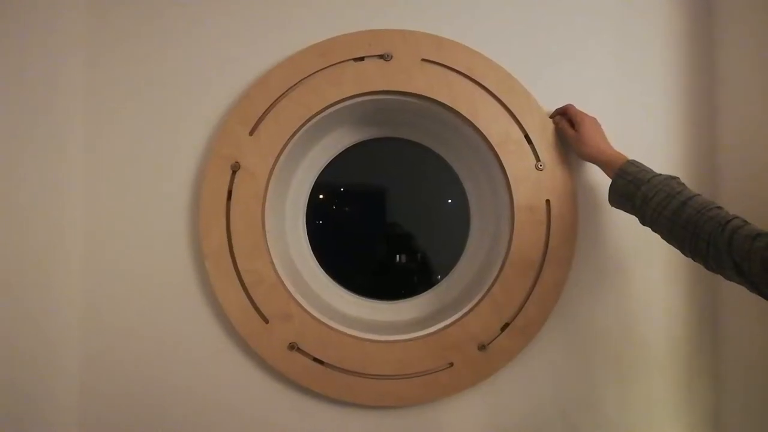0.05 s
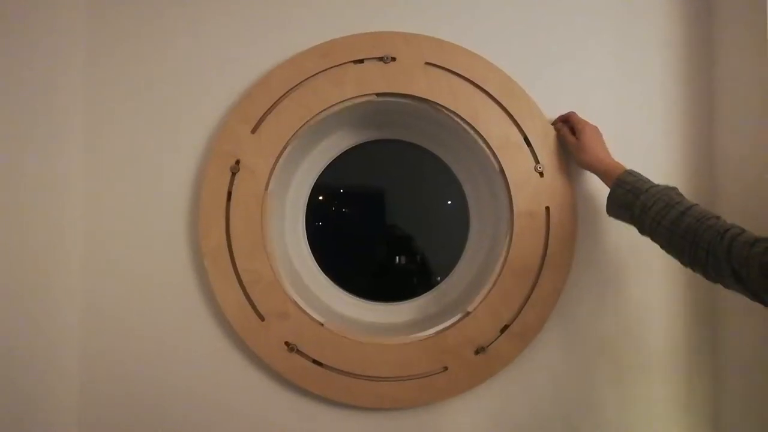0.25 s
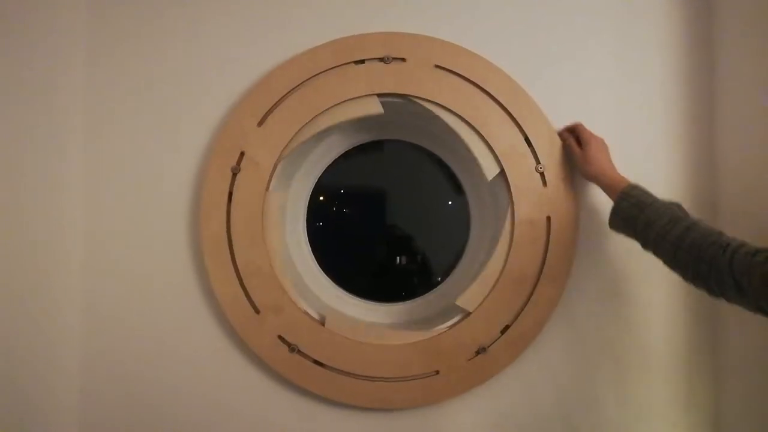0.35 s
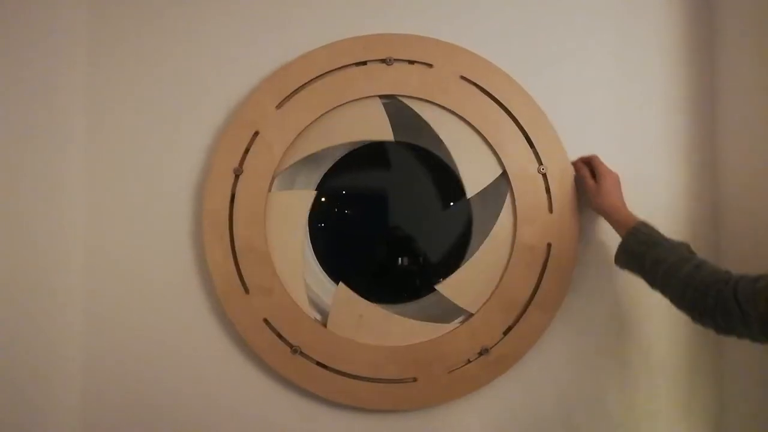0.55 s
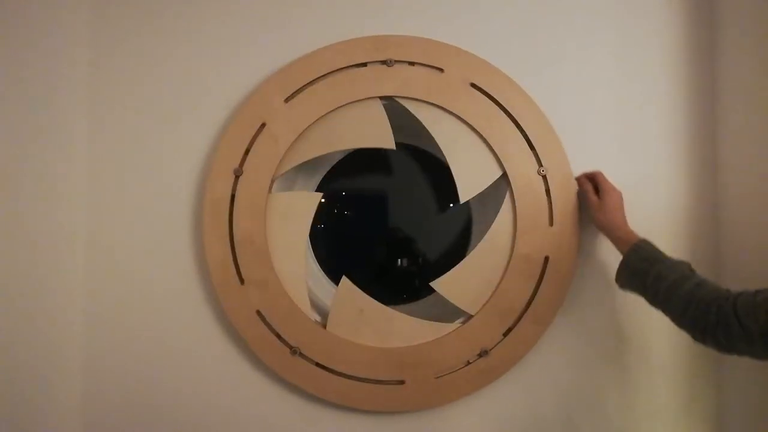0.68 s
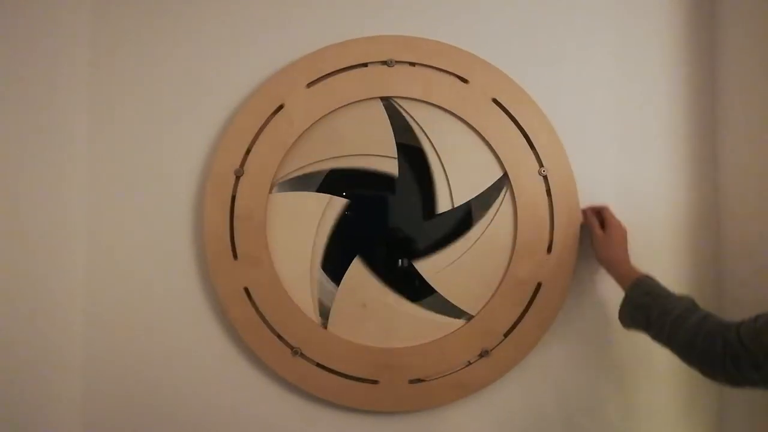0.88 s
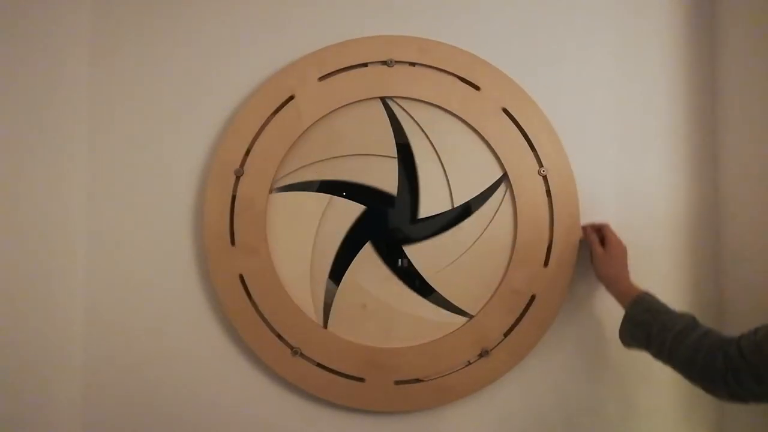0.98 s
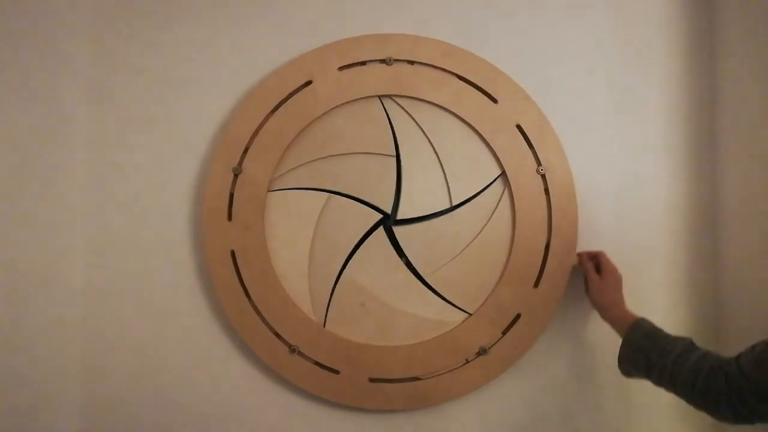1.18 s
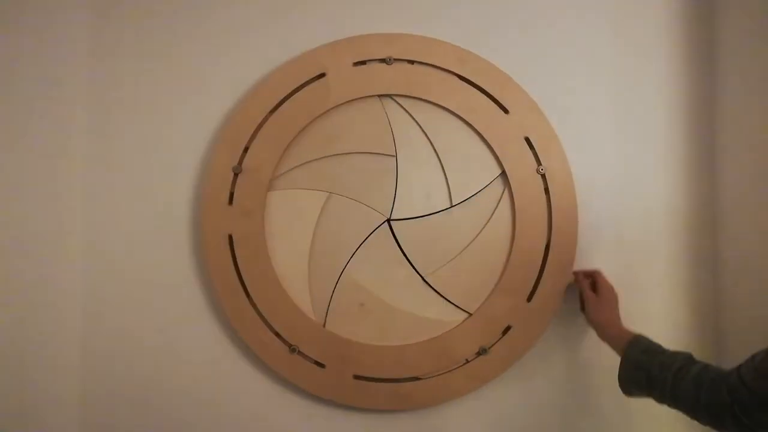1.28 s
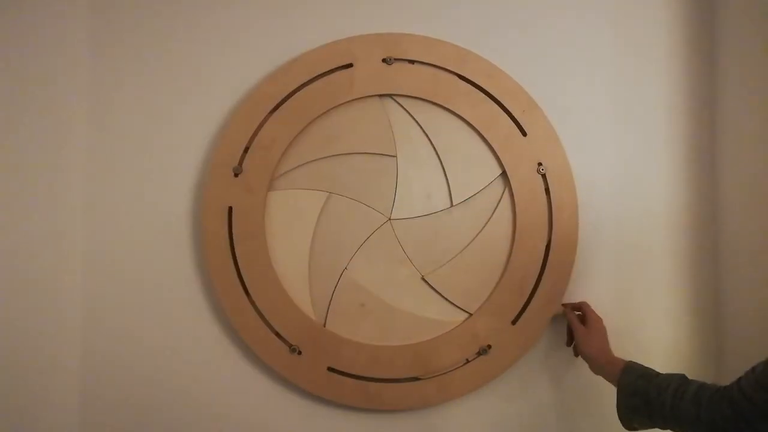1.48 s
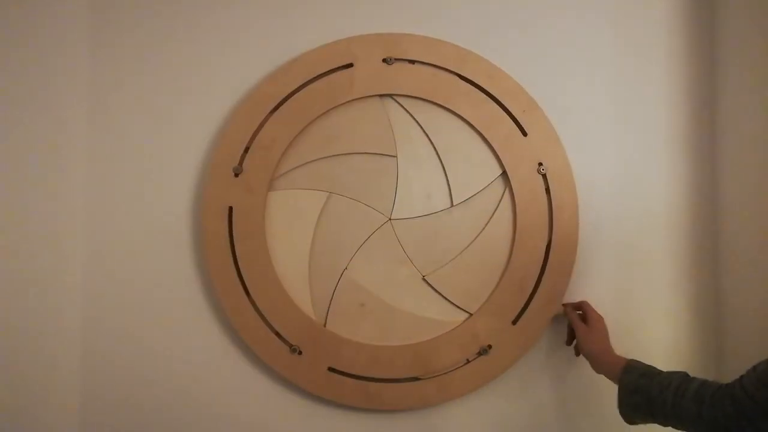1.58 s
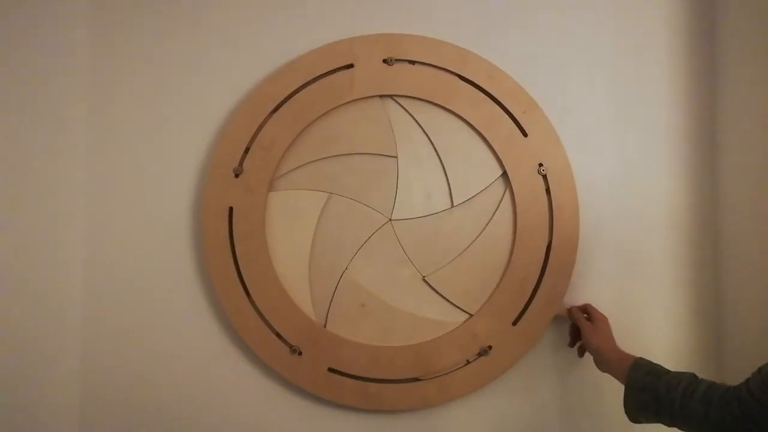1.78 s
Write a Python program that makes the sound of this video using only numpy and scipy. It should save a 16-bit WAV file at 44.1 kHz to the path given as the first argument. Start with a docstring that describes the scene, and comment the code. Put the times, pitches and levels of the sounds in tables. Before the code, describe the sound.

Wooden blades slide and scrape over each other, then knock shut in a small room.

```python
"""A large wooden iris on a wall is turned shut by hand in a small room.
Its plywood blades hiss over each other while the ring sticks, slips and catches in its slots.
The blades meet in a quick cluster of knocks and the frame loads the wall, which booms briefly.
A soft bump on the microphone follows, over quiet room tone."""
import sys
import numpy as np
from scipy import signal
from scipy.fft import rfft, irfft
from scipy.io import wavfile
from scipy.ndimage import map_coordinates

SR = 44100
rng = np.random.default_rng(int(sys.argv[2]) if len(sys.argv) > 2 else 0)


def output_pcm(signal):
    """Save a mono or channel-first signal as 16-bit PCM at the path in sys.argv[1].

    Samples are clipped to [-1, 1] before scaling.
    """
    pcm = np.clip(np.atleast_2d(signal).T, -1, 1) * 32767
    wavfile.write(sys.argv[1], SR, np.round(pcm).astype(np.int16))


N = 81585

# blade sliding: time_s, hiss_db, scrape_db
BLADE_SLIDE = [(0, -72.5, -64.5), (.018, -121, -64.5), (.045, -94, -121), (.11, -83, -91), (.15, -69, -68),
               (.194, -53.5, -68.5), (.232, -50.5, -55), (.28, -45, -63), (.34, -46, -52.5),
               (.425, -43.5, -52.5), (.5, -48.5, -51.5), (.6, -48.5, -55), (.73, -46.5, -53),
               (.755, -42.5, -50.5), (.87, -42, -50.5), (1.0, -47.5, -51), (1.09, -51, -54.5),
               (1.22, -53, -54), (1.35, -55, -53), (1.43, -50.5, -51), (1.472, -55, -49.5),
               (1.5, -56, -62.5), (1.55, -77, -84)]
# fine hiss spectrum: freq_hz, gain_db
HISS_SPECTRUM = [(150, -50), (600, 7.5), (1200, -9.5), (2300, 2), (3400, -0.5), (5300, 2.5), (7000, 7),
                 (9000, 5.5), (15000, -3)]
# coarse scrape spectrum: freq_hz, gain_db
SCRAPE_SPECTRUM = [(60, -37), (200, 5.5), (480, -0.5), (900, -3), (1200, 3.5), (2400, -4.5), (3500, -4.5),
                   (5500, 0), (10000, -5.5), (15000, -40)]
# ring stick-slip: time_s, level_db, pace_hz
RING_RUB = [(0, -67, 151.5), (.08, -85, 149.4), (.2, -91, 148.7), (.28, -68, 160), (.35, -61, 168.8),
            (.45, -54, 201.7), (.52, -55, 166.2), (.61, -59, 150.6), (.68, -69, 149.2),
            (.745, -52.5, 159.4), (.86, -52, 185.4), (.99, -52.5, 179), (1.06, -51.5, 160),
            (1.14, -51, 153.3), (1.25, -49.5, 155.9), (1.35, -52, 156.8), (1.44, -53.5, 166.2),
            (1.49, -84, 165)]
# plywood response to slips: freq_hz, gain_db
JUDDER_SPECTRUM = [(25, -34), (50, -22), (90, -7), (125, 8.5), (155, 0), (190, -5), (230, 4), (310, -15),
                   (480, -12), (800, -21.5), (1500, -43.5), (5000, -65)]
# pins catching in slots: start_s, level_db, pitch_hz
PIN_CATCHES = [(.413, -51, 256), (.446, -39.5, 248), (0.465, -49, 230), (.54, -43.5, 516),
               (.551, -47.5, 732), (.559, -39, 454), (.573, -42.5, 642), (.593, -45, 437),
               (0.605, -52, 586), (.622, -42.5, 512), (.795, -44, 463.4), (.842, -43, 474.2),
               (0.866, -42, 250), (.933, -42, 220), (0.982, -43.5, 230), (1.07, -50.5, 443),
               (1.288, -42, 451.4), (1.317, -42, 389.4), (1.38, -43, 333), (1.398, -44, 273),
               (1.411, -39, 411), (1.43, -40, 297)]
# blades meeting: start_s, strength_db
BLADE_KNOCKS = [(1.442, -1.5), (1.45, -7), (1.4548, -5.5), (1.4628, -2.5), (1.4686, -2), (1.477, -13),
                (1.486, -11.5), (1.5, -10)]
# closed iris modes: freq_hz, gain_db, t60_s
IRIS_MODES = [(145, -21, 0.12), (230, 0, 0.19), (291, -11.5, 0.28), (381, 6.5, 0.096), (512, 3.5, 0.042),
              (634, -17, 0.15), (830, -5, 0.064), (1003, 3.5, 0.11), (1217, -6, 0.14), (1420, -23, 0.11),
              (1860, -34, .1), (2050, -5, .12)]
# wood impact noise: freq_hz, gain_db
CRACK_SPECTRUM = [(80, -12), (250, -4), (600, -2.5), (1100, -9), (1500, -14.5), (2400, -18), (4000, -30),
                  (8000, -24), (15000, -56)]
# frame loading the wall: start_s, strength_db
FRAME_SHOVES = [(1.373, -9.5), (1.469, -5)]
# wall modes: freq_hz, gain_db, t60_s
WALL_MODES = [(37.7, -57, 1.7), (83.1, -64, .16), (97.7, -39.5, 0.39)]
# room tone spectrum: freq_hz, gain_db
TONE_SPECTRUM = [(20, -1.5), (40, -0.5), (65, -9.5), (92, 10.5), (130, -29), (300, -11), (800, -16.5),
                 (2000, -21), (6000, -19), (10000, -26.5), (15000, -20)]
# room decay: freq_hz, t60_s
ROOM_DECAY = [(100, 0.27), (240, 0.38), (450, 0.41), (1000, 0.34), (2500, 0.41), (5000, 0.25), (11000, 0.1)]
# microphone port responses: freq_hz, left_db, right_db
PORT_RESPONSE = [(104, 3, 2), (1270, 1.5, 1.6), (2330, 5.64, 4.46), (3780, 4, 4), (5500, 3.1, -0.6),
                 (7500, -2.5, 0.5), (9070, 4.5, 5), (10320, -8.5, 11), (12930, -0.5, 3), (15300, -7.5, -1)]

TIME_S = np.arange(N) / SR
PORT_LAG_S = .00005  # left port lag for the iris centre


def blade_slide(count=5, lag_spread_s=.00025, patch_db=1.63, patch_hz=89.82):
    """Fibres flick past each other; each blade rubs in its own patches, with its own lag between ports."""
    hiss_gain = undb(curve(BLADE_SLIDE))
    scrape_gain = undb(curve(BLADE_SLIDE, column=2) + 2)
    out = 0
    for place in np.linspace(-1, 1, count):
        hiss = unit_rms(colour(fibre_clicks(spread_db=7.5), HISS_SPECTRUM)) * hiss_gain
        scrape = unit_rms(colour(fibre_clicks(spread_db=5.5), SCRAPE_SPECTRUM)) * scrape_gain
        rubbing = (hiss + scrape) * undb(patch_db * wander(patch_hz))
        out += room(wall_echo(rubbing), wet_db=4.5, lag_s=PORT_LAG_S + place * lag_spread_s)
    return out / np.sqrt(count)


def fibre_clicks(spread_db):
    """Dense tiny clicks of very uneven size."""
    return rng.standard_normal(N) * undb(spread_db * np.minimum(rng.standard_normal(N), 3))


def ring_judder(lock_hz=160, slip_spread_db=2.2, flutter_db=2.5, flutter_hz=55.03):
    """Stick-slip shakes the plywood: an even groan up to the ring's resonance, ragged when faster."""
    pace_hz = curve(RING_RUB, column=2)
    jitter = .06 + 1.1 * np.maximum(pace_hz / lock_hz - 1, 0)
    rate_hz = pace_hz * np.exp(jitter * wander(rate_hz=150))
    slip_count = np.floor(np.cumsum(rate_hz) / SR)
    slips = np.diff(slip_count, prepend=0) - rate_hz / SR  # zero-mean pulses
    sizes = undb(slip_spread_db * wander(lock_hz) + flutter_db * wander(flutter_hz))
    return unit_rms(colour(slips * sizes, JUDDER_SPECTRUM)) * undb(curve(RING_RUB) - 1)


def pin_catches(t60_s=.06, rise_s=.0012):
    """Each pin snags and lets go with a short, gritty wooden note."""
    grit = .34 * unit_rms(colour(rng.standard_normal(N), CRACK_SPECTRUM))
    out = 0
    for start_s, level_db, pitch_hz in PIN_CATCHES:
        age_s = since(start_s)
        note = mode(age_s, pitch_hz, t60_s) + grit * decay(age_s, t60_s)
        out += undb(level_db) * note * (1 - np.exp(-age_s / rise_s))
    return out


def blade_knocks(wood_db=-49.5, crack_db=-37, mix_spread_db=2):
    """Blades knock home in turn; each blow cracks and rings the same modes in its own mix."""
    grit = unit_rms(colour(rng.standard_normal(N), CRACK_SPECTRUM))
    out = 0
    for start_s, strength_db in BLADE_KNOCKS:
        age_s = since(start_s)
        wood = 0
        for freq_hz, gain_db, t60_s in IRIS_MODES:
            polarity, size = rng.standard_normal(2)
            wood += np.sign(polarity) * undb(gain_db + mix_spread_db * size) * mode(age_s, freq_hz, t60_s)
        crack = grit * decay(age_s, t60_s=.065)
        out += undb(strength_db) * (undb(wood_db) * wood + undb(crack_db) * crack)
    return out


def wall_boom(rise_s=.012):
    """The frame leans on the wall, whose modes swell into a soft boom."""
    out = 0
    for start_s, strength_db in FRAME_SHOVES:
        age_s = since(start_s)
        boom = sum(undb(gain_db) * mode(age_s, freq_hz, t60_s) for freq_hz, gain_db, t60_s in WALL_MODES)
        out += undb(strength_db) * boom * (1 - np.exp(-age_s / rise_s))
    return out


def microphone_bump(time_s=1.792, width_s=.001, tap_db=-42.5, thump_db=-50, right_db=-29):
    """A dull touch on the microphone: a pulse, then a low thump, mostly left."""
    tap = np.exp(-((TIME_S - time_s) / width_s) ** 2)
    thump = mode(since(time_s + 2 * width_s), freq_hz=74.6, t60_s=.092)
    return (undb(thump_db) * thump - undb(tap_db) * tap) * np.array([[1], [undb(right_db)]])


def wall_echo(x, travel_s=(.18, 1.47), open_delay_s=.000694, shut_delay_s=.001316, echo_db=-16):
    """A close reflection, later as the blades move inward: a drifting, hollow colour."""
    delay_s = np.interp(TIME_S, travel_s, (open_delay_s, shut_delay_s))
    echo = map_coordinates(x, [np.arange(N) - delay_s * SR], order=3)
    return (x + undb(echo_db) * echo) / np.hypot(1, undb(echo_db))


def room(x, wet_db, lag_s=PORT_LAG_S):
    """Direct sound, shifted by lag_s on the left, plus a diffuse tail whose treble dies first."""
    size = 2 ** 15
    freq_hz = np.fft.rfftfreq(size, 1 / SR)
    noise_spectrum = rfft(diffuse_noise(size))
    age_s = since(.002)[:size]
    tail = 0
    for band_hz, t60_s in ROOM_DECAY:
        band = at_freq([(hz, hz == band_hz) for hz, _ in ROOM_DECAY], freq_hz)
        envelope = decay(age_s, t60_s)
        tail += irfft(noise_spectrum * band) * envelope / np.linalg.norm(envelope)
    direct = np.array([np.roll(x, round(lag_s * SR)), x])
    reverb = signal.fftconvolve(x[None], tail, axes=1)[:, :N]
    return (direct + undb(wet_db) * reverb) / np.hypot(1, undb(wet_db))


def room_tone(level_db=-68.5):
    """The still room: steady, bass-heavy noise."""
    return unit_rms(np.array([colour(side, TONE_SPECTRUM) for side in diffuse_noise(N)])) * undb(level_db)


def diffuse_noise(size, wide_hz=880):
    """Noise from all sides: left and right alike in the bass, unrelated in the treble."""
    mid, side = rfft(rng.standard_normal((2, size)))
    width = np.minimum(np.fft.rfftfreq(size, 1 / SR) / wide_hz + .058, 1)
    return irfft(np.array([mid + width * side, mid - width * side]) / np.hypot(1, width), size)


def undb(db):
    """Decibels to gain."""
    return 10 ** (np.asarray(db) / 20)


def unit_rms(x):
    """Scale to rms 1."""
    return x / np.sqrt(np.mean(x ** 2))


def curve(rows, column=1):
    """Table column, interpolated over time."""
    rows = np.array(rows)
    return np.interp(TIME_S, rows[:, 0], rows[:, column])


def at_freq(rows, freq_hz, column=1):
    """Table column, interpolated over log frequency."""
    rows = np.array(rows)
    return np.interp(np.log(np.maximum(freq_hz, 1)), np.log(rows[:, 0]), rows[:, column])


def colour(x, rows, column=1, size=4096):
    """Minimum-phase filter from a table of freq_hz, gain_db."""
    gain = undb(at_freq(rows, np.fft.rfftfreq(size, 1 / SR), column))
    cepstrum = irfft(np.log(gain))
    cepstrum[1:size // 2] *= 2
    cepstrum[size // 2 + 1:] = 0
    return signal.fftconvolve(x, irfft(np.exp(rfft(cepstrum))))[:N]


def wander(rate_hz):
    """Smooth random curve, rms 1."""
    knots = rng.standard_normal(2048)
    return unit_rms(map_coordinates(knots, [TIME_S * rate_hz], order=3, mode="mirror"))


def since(start_s):
    """Seconds after start_s, zero before."""
    return np.maximum(TIME_S - start_s, 0)


def decay(age_s, t60_s):
    """Exponential decay, silent before onset."""
    return (age_s > 0) * np.exp(-np.log(1000) * age_s / t60_s)


def mode(age_s, freq_hz, t60_s):
    """One struck mode."""
    return np.sin(2 * np.pi * freq_hz * age_s) * decay(age_s, t60_s)


def scene():
    """The iris turns and shuts, then the bump, over room tone."""
    tone = room_tone()
    turning = blade_slide() + room(ring_judder() + pin_catches(), wet_db=-7)
    closing = room(blade_knocks(), wet_db=2) + wall_boom()
    return turning + closing + microphone_bump() + tone


def record(dry):
    """Each microphone port colours its side; a steep low-pass cuts the top."""
    left = colour(dry[0], PORT_RESPONSE, column=1)
    right = colour(dry[1], PORT_RESPONSE, column=2)
    cutoff_hz = 15400
    lowpass = signal.ellip(10, .2, 80, cutoff_hz, fs=SR, output="sos")
    return signal.sosfilt(lowpass, np.array([left, right]))


dry = scene()
out = record(dry)
output_pcm(out)
```